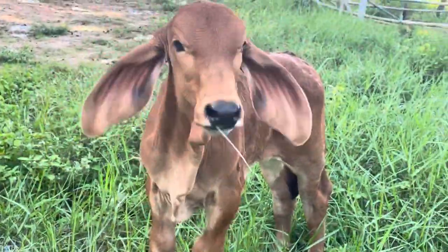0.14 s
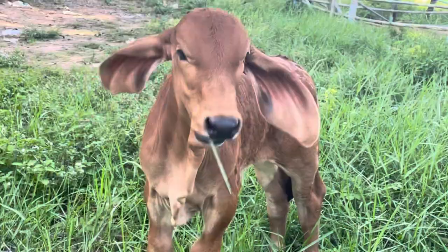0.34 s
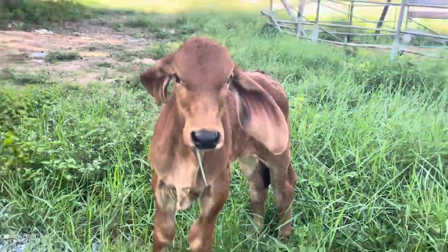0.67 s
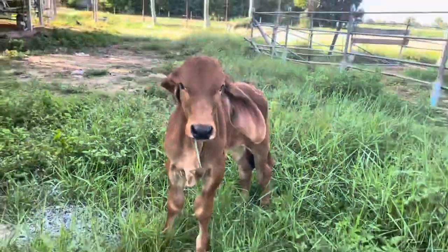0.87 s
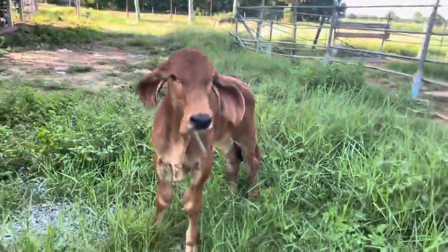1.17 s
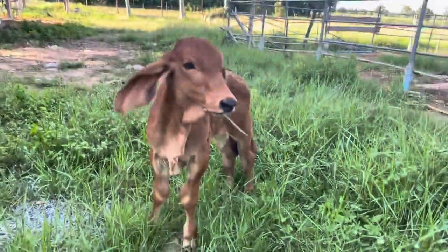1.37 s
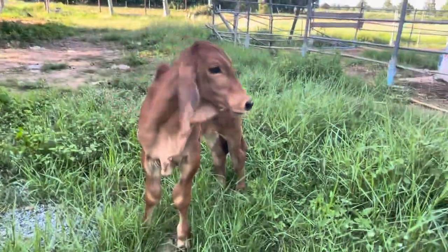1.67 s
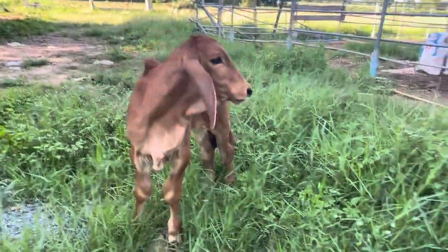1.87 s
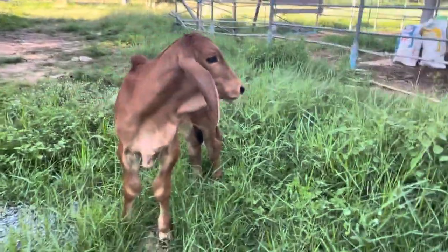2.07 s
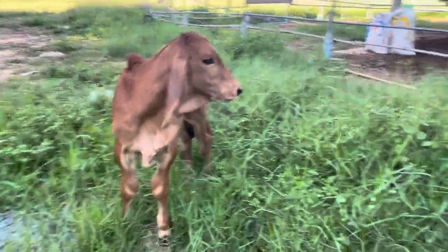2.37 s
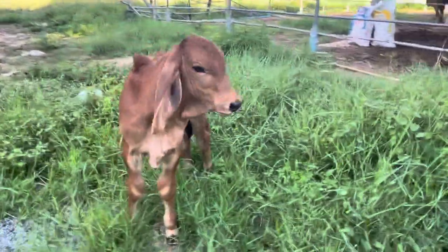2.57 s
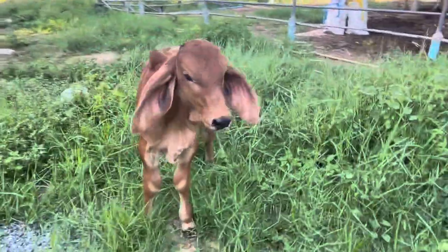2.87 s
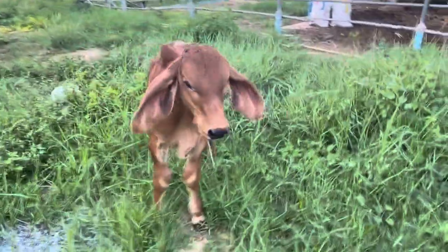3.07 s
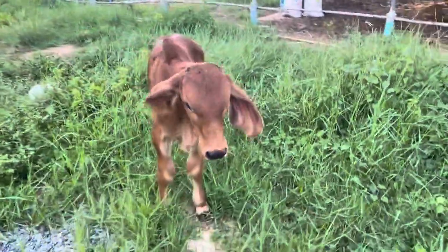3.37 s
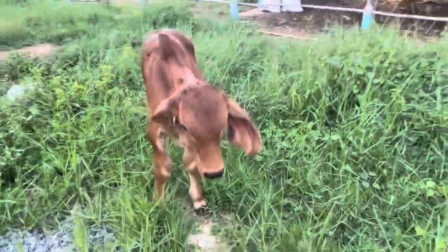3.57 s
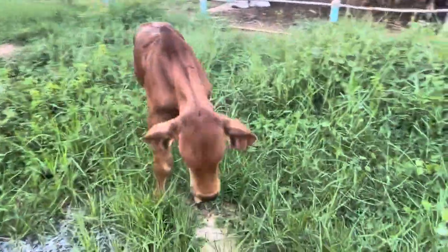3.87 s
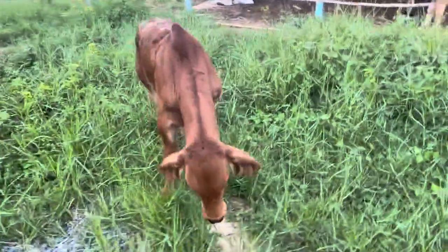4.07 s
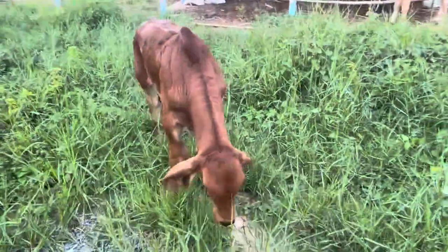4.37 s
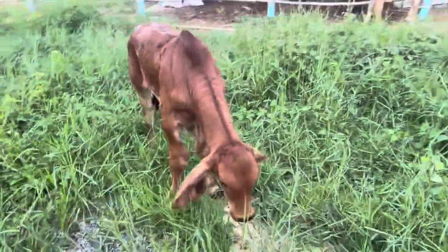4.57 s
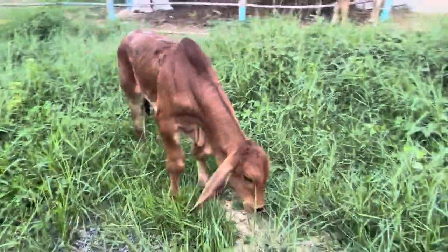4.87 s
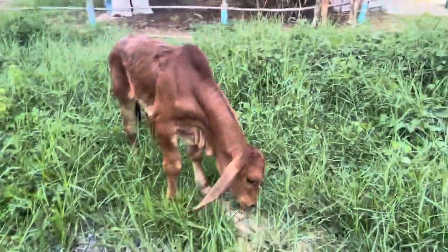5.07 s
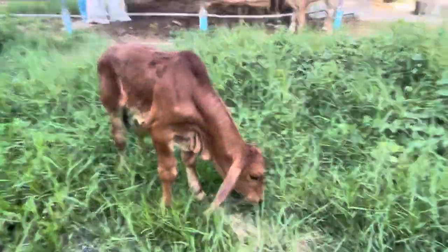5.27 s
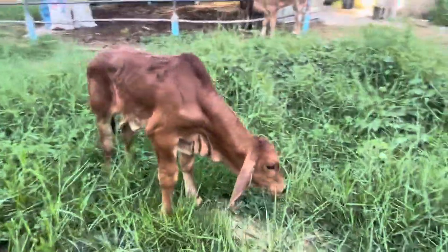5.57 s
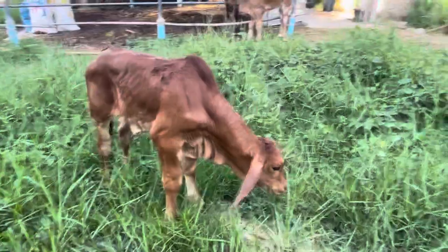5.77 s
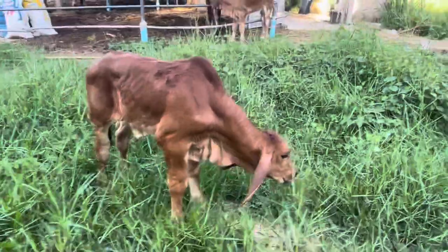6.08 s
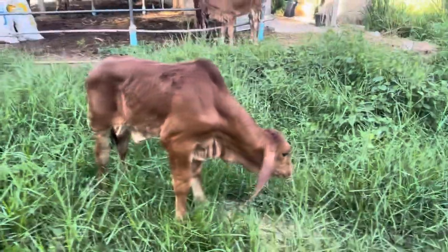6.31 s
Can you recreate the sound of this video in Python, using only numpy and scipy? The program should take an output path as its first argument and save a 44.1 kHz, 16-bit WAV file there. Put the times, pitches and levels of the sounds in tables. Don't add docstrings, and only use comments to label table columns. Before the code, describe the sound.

Outdoors in a grassy paddock, wind thumps the microphone while a calf croaks, then bawls hoarsely; stems crackle and distant birds whistle afterwards.

```python
import sys
import numpy as np
from scipy import signal
from scipy.fft import rfft, irfft
from scipy.io import wavfile
from scipy.ndimage import uniform_filter1d, map_coordinates

SR = 44100
rng = np.random.default_rng(int(sys.argv[2]) if len(sys.argv) > 2 else 0)


def to_wav(s):
    ch = np.atleast_2d(s).T
    pcm = np.round(np.clip(ch, -1, 1) * 32767)
    wavfile.write(sys.argv[1], SR, pcm.astype(np.int16))


def gain_from_decibels(decibels):
    exponent = np.asarray(decibels, float) / 20
    return 10 ** exponent


N = 284180
T = np.arange(N) / SR
HZ = np.fft.rfftfreq(N, 1 / SR) + 1e-3

# first_pulse_s, pulse_count, spacing_ms, effort_db
GROWL_RUNS = [(1.111, 1, 14, -22), (1.125, 1, 16, -17.5), (1.141, 3, 24.3, -17), (1.205, 3, 25, -16.5),
              (1.271, 4, 25.3, -17.5), (1.364, 4, 25.1, -17.5), (1.457, 4, 25.1, -16.5),
              (1.558, 5, 26.1, -16.5), (1.677, 2, 25, -16), (1.718, 4, 20, -22), (1.81, 20, 26.5, -36)]
# time_s, change_db
ACCENTS = [(1.153, 7), (1.217, 7), (1.284, 6), (1.296, -16), (1.347, 5), (1.439, 3), (1.532, 4),
           (1.364, -11), (1.377, 8), (1.402, 5), (1.47, 2), (1.495, 4), (1.508, 3), (1.546, 6), (1.702, 2),
           (1.718, -3), (1.74, -8), (1.762, -8)]
# centre_hz, width_hz, level_db
GROWL_THROAT = [(322, 70, -18.5), (442, 63, -15.5), (520, 15.6, -18), (737, 33, -2), (867, 100, -1),
                (1074, 116, 6.5), (1164, 110, -7), (1436, 83, -3), (1610, 150, -3.5), (1744, 54, -10.5),
                (2640, 92, -19.5)]
# centre_hz, width_hz, level_db
GROWL_MOUTH = [(1890, 54, -11), (2033, 55, -4)]
# time_s, then pitch_share of the low, the middle and the mouth resonances
THROAT_MOVES = [(1.1, .96, .97, 1.0), (1.15, .99, 1.0, 1.0), (1.19, 1.09, 1.02, .99),
                (1.225, 1.07, 1.02, .98), (1.25, 1.0, 1.01, .98), (1.4, 1.0, .98, .97),
                (1.62, .98, .96, 1.01), (1.655, .97, .92, .93), (1.75, .97, .88, .92)]
# centre_hz, width_hz, level_db
GROWL_BREATH = [(3150, 70, -41), (3560, 60, -29.5), (4550, 150, -41)]
# centre_hz, width_hz, level_db
NOSTRIL = [(4010, 60, -29)]
# centre_hz, width_hz, level_db
CRACK = [(2550, 200, -42), (3100, 120, -40), (3450, 80, -36), (4350, 100, -40), (4650, 100, -39)]
# start_s, length_s, from_hz, to_hz, level_db
LEAKS = [(1.77, .1, 3060, 3100, -60), (1.85, .2, 3120, 3100, -63), (1.72, .12, 1900, 1850, -59),
         (1.94, .18, 1860, 1840, -56)]

# time_s, rate_hz
NARROW_RATE = [(2.66, 214), (2.8, 234), (2.9, 110), (2.98, 40)]
# time_s, rate_hz
OPEN_RATE = [(2.84, 109.6), (3.05, 92), (3.4, 68.5), (3.6, 58), (4.1, 50.5)]
# time_s, level_db, chest_over_head_db
EFFORT = [(2.66, -61, -20), (2.76, -44, -15), (2.84, -36, 3), (3.0, -32, -1), (3.14, -29.5, 4.5),
          (3.24, -29, -0.5), (3.47, -36.5, 3), (3.8, -37, -11), (4.12, -54, -9)]
# start_s, end_s, mouth_db, sag_db_per_s
SHAPES = [
    (2.66, 2.94, 10.5, 20),
    (2.82, 3.6, -1.5, 7),
    (3.5, 4.05, 4, 12),
]
# centre_hz, width_hz, level_db
NARROW_SHAPE = [
    [(872, 14, 2), (1430, 87, -18)],
    [(1504, 68, -4), (1655, 52, -7.5), (2020, 93, -13.5), (3700, 87, -13)],
]
OPEN_SHAPE = [
    [(720, 64, 3), (801, 54, 4), (1003, 90, 3), (1290, 100, -6)],
    [(1566, 127, 4.5), (1870, 67, -7), (1905, 61, -4), (2144, 58, -7.5), (3570, 96, -16), (4500, 70, -23.5), (5000, 60, -23), (5270, 60, -22)],
]
CLOSING_SHAPE = [
    [(804, 62, -3), (990, 114, 2), (2080, 52, -15), (2460, 140, -7.5), (3500, 90, -16), (4400, 330, -16)],
    [(1322, 48, -1.5), (1440, 104, -4.5), (1900, 76, -20)],
]
# centre_hz, width_hz, level_db
CHEST = [(190, 40, -5), (264, 28, 0), (335, 45, -6), (425, 50, -12)]
# time_s, pitch_hz, level_db
TONE = [(2.88, 292, -50), (3.0, 272, -33), (3.07, 266, -26.5), (3.17, 262, -26.5), (3.21, 262, -41),
        (3.27, 270, -33), (3.42, 258, -34), (3.68, 240, -47), (3.75, 236, -62)]
# multiple, level_db
TONE_ORDERS = [(1, 1), (2, -38), (3, -4), (4, -16), (6, -25), (7, -20.5)]
# start_s, length_s, from_hz, to_hz, level_db
PARTIALS = [(2.68, .13, 1630, 1740, -50), (2.72, .2, 875, 815, -45), (2.79, .09, 1510, 1490, -47),
            (2.9, .18, 1615, 1540, -42), (3.09, .1, 1600, 1670, -46), (2.87, .05, 1500, 1480, -48),
            (2.94, .16, 1030, 1000, -45), (3.2, .11, 820, 785, -35), (3.3, .15, 800, 770, -37),
            (3.2, .14, 1910, 1960, -44), (3.0, .16, 2150, 2090, -49), (3.04, .1, 800, 780, -42),
            (3.55, .2, 1345, 1375, -46), (3.84, .14, 990, 1010, -48), (3.99, .25, 190, 228, -44),
            (2.78, .4, 3660, 3550, -56), (3.0, .17, 5250, 5230, -63), (3.12, .16, 4930, 4960, -64),
            (3.15, .1, 5480, 5520, -64), (3.42, .08, 5040, 5050, -63), (3.5, .08, 4950, 4940, -63)]
# frequency_hz, level_db, phase_rad
GROWL_EAR = [(700, -9, -1.65), (1100, -4, -1.9), (1350, 0, -3.2), (1750, -2, -3.6), (2100, -7, -5.8),
             (2650, -6, -9.5), (3300, -1, -12), (4000, -3, -13.2)]
# frequency_hz, level_db, phase_rad
BAWL_EAR = [(300, 1, -.8), (550, -5, -1.9), (750, -5, -2), (1050, 0, -2.7), (1450, 4, -4), (2080, 4, -6.4),
            (2700, 2, -8.8), (3500, -11, -10)]

# time_s, rumble_db, flutter_db
BREEZE = [(0, -35, -38.5), (.7, -42.5, -45), (1.2, -35, -34.5), (1.55, -36, -35.5), (1.78, -35, -36.5),
          (2.0, -33, -40.5), (2.4, -47, -42), (2.85, -25, -30.5), (3.2, -37, -31), (3.5, -43, -44.5),
          (4.2, -43.5, -45), (4.9, -43.5, -37.5), (5.3, -47.5, -50.5), (6.0, -50.5, -54),
          (6.44, -45.5, -46.5)]
# peak_s, peak_db, length_s
GUSTS = [(0.0, -31, 0.0083), (0.09, -27, 0.12), (0.478, -28.5, 0.03), (0.693, -34, 0.1),
         (0.985, -27.5, 0.11), (1.05, -22.5, 0.023), (1.163, -26, 0.05), (1.392, -22.5, 0.028),
         (1.452, -21, 0.025), (1.546, -24.5, 0.024), (1.718, -29, 0.064), (1.917, -31, 0.058),
         (2.038, -24, 0.042), (2.187, -22.5, 0.056), (2.356, -29, 0.048), (2.417, -27, 0.058),
         (2.564, -24.5, .02), (2.621, -14.5, 0.015), (2.753, -21.5, 0.098), (2.976, -25.5, 0.08),
         (3.124, -26.5, 0.036), (3.338, -32, 0.019), (3.596, -29.5, 0.032), (4.241, -32, 0.032),
         (4.894, -39, 0.1), (5.454, -39.5, 0.042), (5.61, -37.5, 0.053), (5.762, -37.5, 0.017)]
FLUTTER_GUST_DB = [0.5, -12.5, -12, -13, -13, -10.5, -10.5, -11, -11, -8, -10, -12, -11.5, -12, -10.5,
                   -17.5, -8, -14, -9.5, -14, 2, -10, -7, -8, -8, -1.5, -9.5, -9.5]
# frequency_hz, density_db
WIND_COLOUR = [(25, -54), (40, -7), (65, 1), (100, -3.5)]
# frequency_hz, density_db
FLUTTER_COLOUR = [(120, 2), (170, -0.5), (250, -5.5), (330, -19.5), (480, -29)]

# time_s, peak_db, ring_hz
KNOCKS = [(0.429, -46.5, 257), (0.498, -50, 231), (2.634, -62, 272), (4.148, -41, 256), (4.24, -30, 266),
          (4.569, -35, 300), (4.869, -32, 310), (5.14, -34.5, 730), (5.212, -33, 273), (5.214, -40, 690),
          (5.399, -38.5, 336), (5.854, -49, 645)]
# time_s, peak_db, left_minus_right_db
SNAPS = [(0.1294, -51, 0.0), (0.2234, -48, 0.0), (1.6741, -50, 2.0), (2.9921, -42, 0.5),
         (4.2263, -39, -1.5), (4.4952, -51, 1.0), (4.5441, -48, 0.5), (4.9154, -44, 0.0),
         (4.9257, -38, 1.5), (4.9304, -39, 1.5), (4.9444, -38, 2.5), (4.9554, -38, 1.5), (4.9934, -49, 0.5),
         (5.0074, -49, 1.5), (5.1044, -54, 0.5), (5.1442, -42, 0.5), (5.2144, -58, 1.0), (5.4444, -57, 0.5)]
# time_s, peak_db, ring_hz
TICKS = [(5.105, -49, 2900), (5.214, -31, 3200), (5.444, -46, 3800), (5.718, -33, 1800), (6.06, -44, 2500),
         (3.56, -46, 4200), (0.47, -43, 940)]
# start_s, hold_s, level_db
RUSTLES = [(0.0, 0.0031, -54), (0.223, 0.075, -65), (2.8, 0.062, -64), (2.893, 0.18, -58.5),
           (2.992, 0.254, -53), (3.265, 0.16, -59), (3.438, .04, -59), (3.536, 0.22, -61.5),
           (3.763, 0.043, -60.5), (3.852, 0.13, -59), (4.22, 0.0028, -60), (4.29, .004, -66),
           (4.68, 0.045, -67), (4.922, 0.037, -50), (4.977, 0.051, -58.5), (5.06, 0.084, -64),
           (5.678, .025, -63), (6.302, 0.062, -59), (6.397, .045, -61)]
# frequency_hz, density_db
GRASS_COLOUR = [(3500, -0.5), (5000, -1), (7000, -0.8), (9000, -3), (12000, -4), (13500, -9.5),
                (15600, -12)]

# top_s, top_hz, level_db
CHIRPS = [(4.408, 4985, -57), (4.80, 5045, -52), (5.149, 5055, -55), (5.53, 5055, -49), (5.914, 5055, -52),
          (6.348, 5225, -48)]
# offset_s, pitch_share, level_db
ARCH = [(-.03, .74, -15), (-.021, .85, -5), (-.013, .97, 1), (0, 1.0, 8), (.013, .96, 3), (.027, .84, -4),
        (.042, .65, -15)]
# start_s, length_s, from_hz, to_hz, level_db
WHISTLES = [(5.39, .03, 3150, 3250, -60), (5.485, .022, 3600, 3600, -55), (5.49, .05, 3050, 2500, -52),
            (5.525, .05, 2550, 2150, -46), (5.57, .06, 2200, 2050, -49), (5.685, .022, 2250, 2150, -48),
            (5.782, .045, 3400, 2850, -49), (5.812, .035, 2900, 2860, -47), (5.835, .085, 2880, 2930, -56),
            (5.908, .028, 2970, 2900, -47), (5.925, .04, 2900, 2400, -49), (5.948, .03, 2500, 2200, -43),
            (5.97, .065, 2300, 2100, -49), (6.092, .018, 2200, 2150, -46)]
# time_s, level_db
SCOLD = [(6.395, -63), (6.403, -49.5), (6.44, -49)]

# time_s, level_db, share_from_calf_side (0-1)
FIELD = [(0, -45.5, 0.84), (1, -49, 0.28), (1.6, -43.5, 0.23), (2.65, -48, 0.6), (3.3, -37, 0.92),
         (3.9, -42.5, 0.48), (4.15, -45, 0.53), (4.5, -44.5, 0.57), (5.2, -45.5, 0.6), (6.2, -44, 0.2),
         (6.44, -45, 0.5)]
# frequency_hz, density_db
FIELD_COLOUR = [(200, 8), (350, -5), (800, 3), (1100, 2), (1500, -7), (2100, -10.5), (3400, -20),
                (5500, -21.5)]
# frequency_hz, level_db
RIGHT_EAR = [(150, -9), (300, 0), (600, -13.5), (1100, -5), (1500, 3.5), (2200, 6), (3200, -18), (6000, -9)]

# time_s, bass_side_db, upper_middle_side_db
STEREO_OPENS = [(0, -8, -40), (.8, -8, -40), (.86, 0, 0), (6.44, 0, 0)]
# channel (0 mid, 1 side), low_hz, high_hz, threshold_db
DROPPED = [(0, 7600, 9050, -66), (0, 13700, 16500, -63), (1, 10400, 12800, -61)]
# start_s, end_s, low_hz, high_hz
HOLES = [(3.01, 3.085, 2760, 2880), (3.075, 3.14, 2660, 2780), (3.02, 3.11, 5740, 5860),
         (3.2, 3.275, 6090, 6220), (3.14, 3.2, 6660, 6790), (3.3, 3.35, 6720, 6850),
         (1.295, 1.35, 1250, 1340)]


def growl():
    clicks, weak = np.zeros((2, N))
    for s, count, spacing_ms, db in GROWL_RUNS:
        k = np.arange(0, count - .5, .5)
        chance = rng.standard_normal((len(k), 2))
        loose_s = .0003 + .002 * (k % 1) + .004 * (count > 10)
        at = ((s + k * spacing_ms / 1000 + loose_s * chance[:, 0]) * SR).astype(int)
        clicks[at] = gain_from_decibels(db - 19 * (k % 1) + chance[:, 1])
        weak[at] = clicks[at] * 2 * (k % 1)
    for s, db in ACCENTS:
        near = abs(T - s) < .006
        clicks = clicks * gain_from_decibels(db / 2 * near)
        weak = weak * gain_from_decibels(db * near)
    mouth_db = -20.5 + 26.5 * (T - GROWL_RUNS[0][0]) * (T < 1.71)
    bright = (clicks + weak) * gain_from_decibels(mouth_db)

    air = gain_from_decibels(-36) * rng.standard_normal(N)
    fading = [1, -np.exp(-1 / (.012 * SR))]
    low_air, high_air = (air * signal.lfilter([1], fading, x) for x in (clicks, bright))
    voiced = moving_throat(0.88 * clicks + 1.28 * low_air, 1.08 * bright + 1.4 * high_air)
    voiced = signal.sosfilt(signal.butter(2, 2700, fs=SR, output="sos"), voiced)
    voiced = dip(voiced, 2330)

    nose_open = (T > 1.145) * (T < 1.56)
    breath = resonate(low_air + .12 * weak, GROWL_BREATH)
    breath = breath + resonate((low_air + .45 * weak) * nose_open, NOSTRIL)
    breath = gain_from_decibels(8 + 1.5 * drift(15)) * breath
    crack_click = 1. * (np.arange(N) == int(1.674 * SR))
    breath = breath + resonate(crack_click, CRACK)
    return (voiced + breath) * gain_from_decibels(-6.0)


def moving_throat(throat_in, mouth_in):
    out, hop, ring = np.zeros(N), 512, 4096
    low, middle, mouth = in_time(THROAT_MOVES)
    for i in range(int(1.09 * SR), int(2.4 * SR), hop):
        a, b = (np.r_[x[i:i + hop], np.zeros(ring)] for x in (throat_in, mouth_in))
        throat_now = []
        for hz, width, db in GROWL_THROAT:
            share = low[i] if 600 < hz < 800 else middle[i] if 800 < hz < 1300 else 1
            throat_now.append((hz * share, width, db))
        mouth_now = [(hz * mouth[i], width, db) for hz, width, db in GROWL_MOUTH]
        out[i:i + hop + ring] += resonate(a, throat_now) + resonate(b, mouth_now)
    return out


def bawl():
    out = 0
    level_db, chest_db = in_time(EFFORT)
    source = hoarse(in_time(OPEN_RATE)[0], jitter=.07, air_db=-26)
    onset = hoarse(in_time(NARROW_RATE)[0], jitter=.04, air_db=-26)
    resonances = (NARROW_SHAPE, OPEN_SHAPE, CLOSING_SHAPE)
    for shape, (throat, mouth), x in zip(SHAPES, resonances, (onset, source, source)):
        start, end, mouth_db, sag_db = shape
        fade = np.clip(np.minimum(T - start, end - T) / 0.1, 0, 1)
        mouth_db = mouth_db - sag_db * np.clip(T - start, 0, 1)
        head = even(resonate(x, throat) + gain_from_decibels(mouth_db) * resonate(x, mouth), fade)
        chest = even(resonate(x, CHEST), fade)
        out = out + np.sqrt(fade) * (head + gain_from_decibels(chest_db) * chest)
    return dip(out * gain_from_decibels(level_db), 2800)


def hoarse(rate, jitter, air_db):
    phase = np.cumsum(rate * (1 + jitter * drift(45))) / SR
    clicks = np.diff(np.floor(phase), prepend=0)
    clicks = clicks * gain_from_decibels(2.5 * np.clip(rng.standard_normal(N), -3, 1))
    gate = 0.55 + np.exp(-3.0 * (phase % 1))
    return clicks + gain_from_decibels(air_db) * gate * rng.standard_normal(N)


def tone():
    hz, db = in_time(TONE)
    phase = 2 * np.pi * np.cumsum(hz * (1 + .006 * drift(14))) / SR
    stack = 0
    for k, order_db in TONE_ORDERS:
        waver_db = np.sqrt(k) * drift(23)
        stack = stack + gain_from_decibels(order_db + waver_db) * np.sin(round(k) * phase)
    return gain_from_decibels(db) * stack * (T > TONE[0][0]) * (T < TONE[-1][0])


def partials(rows):
    return sum(glide(*p) * gain_from_decibels(2.2 * drift(30)) for p in rows)


def wind():
    rumble_db, flutter_db = in_time(BREEZE)
    gusts, flaps = 0, 0
    for (s, db, length), flap_db in zip(GUSTS, FLUTTER_GUST_DB):
        spread = length * np.where(T < s, 0.64, 1)
        gust = gain_from_decibels(db) ** 2 * np.exp(-((T - s) / spread) ** 2)
        gusts = gusts + gust
        flaps = flaps + gain_from_decibels(flap_db) ** 2 * gust
    rumble = patchy(WIND_COLOUR, patch_db=1.5, rate=9.5, likeness=0.7, lag=5.0)
    flutter = patchy(FLUTTER_COLOUR, patch_db=3, rate=20, likeness=.75, lag=-9.0)
    lumps = gain_from_decibels(flutter_db) ** 2 + uniform_filter1d(flaps, size=900)
    push = rumble / uniform_filter1d(np.mean(rumble ** 2, axis=0), size=1300) ** .4
    power = gain_from_decibels(rumble_db) ** 2 + gusts
    low = np.sqrt(power) * (rumble + gusts / power * (push - rumble))
    balance = gain_from_decibels(np.array([[.6], [-.6]]))
    return (low + np.sqrt(lumps) * flutter) * balance * np.minimum(T / .004, 1)


def knocks():
    out = np.zeros(N)
    for s, db, hz in KNOCKS:
        t = np.maximum(T - s, 0)
        out += gain_from_decibels(db + 8.0) * np.sin(2 * np.pi * hz * t) * np.exp(-t / 0.0037)
        out += gain_from_decibels(db + 2.0) * np.sin(2 * np.pi * 170 * t) * np.exp(-t / 0.0032)
        out += gain_from_decibels(db - 8.0) * np.sin(2 * np.pi * 900 * t) * np.exp(-t / 0.0012)
    return lagged(out, -17.5, gain_from_decibels(-0.5))


def snaps():
    level, white = np.zeros((2, N)), rng.standard_normal(N)
    for s, db, pan_db in SNAPS:
        t = T - s
        sides_db = np.array([[pan_db], [-pan_db]]) / 2
        level += gain_from_decibels(db + 3.0 + sides_db) * (t > 0) * np.exp(-np.maximum(t, 0) / 0.0018)
    bright = signal.sosfilt(signal.butter(2, [3700, 14000], "band", fs=SR, output="sos"), white)
    return level * lagged(bright, -2.73)


def ticks():
    s, db, hz = np.transpose(TICKS)[:, :, None]
    t = np.maximum(T - s, 0)
    rings = gain_from_decibels(db) * np.sin(2 * np.pi * hz * t) * np.exp(-t / 0.00046)
    return lagged(np.sum(rings, axis=0), 3.0, gain_from_decibels(5.0))


def grass():
    power = gain_from_decibels(-65) ** 2
    for s, hold, db in RUSTLES:
        before = np.maximum(s - T, 0) / 0.0078
        after = np.maximum(T - s - hold, 0) / 0.011
        power = power + gain_from_decibels(db) ** 2 * np.exp(-2 * (before + after))
    return np.sqrt(power) * patchy(GRASS_COLOUR, patch_db=1.5, rate=11, likeness=0.6, lag=-8.0)


def birds():
    chirps = 0
    for s, hz, db in CHIRPS:
        chirps = chirps + sing([(s + ds, hz * share, db + d) for ds, share, d in ARCH])
    chirps = chirps * gain_from_decibels(2.2 * drift(55) - 1)
    whistles = sum(glide(*w) for w in WHISTLES) * gain_from_decibels(-5.5 + 3 * drift(50))
    scold = rms_one(resonate(rng.standard_normal(N), [(2780, 3400, 0.1)])) * gain_from_decibels(in_time(SCOLD)[0])
    direct = lagged(chirps + scold, -13, gain_from_decibels(-4.5)) * gain_from_decibels(2.5) + lagged(whistles, -12, gain_from_decibels(2))
    return direct + paddock(chirps + whistles, t60=.33, wet_db=-11)


def glide(s, length, from_hz, to_hz, db):
    middle = [(s + share * length, from_hz + share * (to_hz - from_hz), db) for share in (.25, .8)]
    return sing([(s, from_hz, db - 12.0), *middle, (s + length, to_hz, db - 7)])


def sing(rows):
    hz, db = in_time(rows)
    sounding = (T > rows[0][0]) * (T < rows[-1][0])
    return gain_from_decibels(db) * np.sin(2 * np.pi * np.cumsum(hz) / SR) * sounding


def far_field():
    field_db, share = in_time(FIELD)
    field = gain_from_decibels(field_db) * patchy(FIELD_COLOUR, patch_db=1.38, rate=11, likeness=share, lag=19.0)
    field[1] = irfft(rfft(field[1]) * colour(RIGHT_EAR, skirt_db=3.0) ** 0.32, N)
    return field


def paddock(x, t60, wet_db):
    t = np.arange(int(.6 * SR)) / SR
    echoes = rng.standard_normal((2, len(t))) * gain_from_decibels(-60 * t / t60) * (t > .006)
    echoes = signal.lfilter([1], [1, -.5], echoes)
    echoes = echoes / np.sqrt(np.sum(echoes ** 2, axis=1, keepdims=True))
    return gain_from_decibels(wet_db) * signal.fftconvolve(x[None], echoes, axes=1)[:, :N]


def patchy(points, patch_db, rate, likeness, lag):
    near, left, right = rfft(rng.standard_normal((3, N))) * colour(points)
    late = near * np.exp(-2j * np.pi * HZ * lag / SR)
    out, together, alike = 0, drift(rate / 3), np.clip(likeness, 0, 1)
    for centre in np.arange(np.log2(points[0][0]) - .5, np.log2(points[-1][0]) + 1, .5):
        strip = np.cos(np.pi / 2 * np.clip((np.log2(HZ) - centre) * 2, -1, 1)) ** 2
        a, b, c, d = irfft(np.array([near, late, left, right]) * strip, N)
        pair = np.sqrt(alike) * np.array([a, b]) + np.sqrt(1 - alike) * np.array([c, d])
        out = out + pair * gain_from_decibels(patch_db * (1.07 * together + drift(rate)))
    return rms_one(out)


def resonate(x, modes):
    out = 0
    for k, (hz, width, db) in enumerate(modes):
        r, w = np.exp(-np.pi * width / SR), 2 * np.pi * hz / SR
        ringing = signal.lfilter([0, np.sin(w)], [1, -2 * r * np.cos(w), r * r], x + 1e-18)
        out = out + (-1) ** k * gain_from_decibels(db) * ringing
    return out


def dip(x, hz):
    return signal.lfilter(*signal.iirnotch(hz, 7, SR), x)


def heard(x, ear):
    last_hz, last_db, last_phase = ear[-1]
    rows = [(0, 0, 0), *ear, (SR / 2, last_db, last_phase * SR / 2 / last_hz)]
    hz, db, phase = np.transpose(rows)
    return lagged(x, 0, gain_from_decibels(np.interp(HZ, hz, db)) * np.exp(1j * np.interp(HZ, hz, phase)))


def lagged(x, lag, gain=1):
    return np.array([x, irfft(rfft(x) * gain * np.exp(-2j * np.pi * HZ * lag / SR), N)])


def colour(points, skirt_db=-30):
    hz, db = np.transpose(points)
    hz = np.r_[hz[0] / 2, hz, hz[-1] * 2]
    db = np.r_[db[0] + skirt_db, db, db[-1] + skirt_db]
    return gain_from_decibels(np.interp(np.log(HZ), np.log(hz), db))


def drift(rate):
    knots = rng.standard_normal(int(N / SR * rate * 2) + 4)
    return rms_one(map_coordinates(knots, [T * rate * 2 + 1], order=3))


def in_time(rows):
    s, *columns = np.transpose(rows)
    return [np.interp(T, s, c) for c in columns]


def even(x, during):
    return x / np.sqrt(np.sum(during * x ** 2) / np.sum(during))


def rms_one(x):
    return x / np.sqrt(np.mean(x ** 2) + 1e-20)


def scene():
    growling, bawling = growl(), bawl() + tone()
    voice = heard(growling, GROWL_EAR) + heard(bawling, BAWL_EAR)
    voice = voice + paddock(.7 * growling + 1.3 * bawling, t60=.35, wet_db=-18)
    voice = voice + heard(partials(PARTIALS), BAWL_EAR) + heard(partials(LEAKS), GROWL_EAR)
    return voice + wind() + knocks() + snaps() + ticks() + grass() + birds() + far_field()


def low_pass(x):
    return signal.sosfilt(signal.butter(12, 15800, fs=SR, output="sos"), x)


def record(dry):
    pair = np.array([dry[0] + dry[1], dry[0] - dry[1]]) / 2
    bass, upper_middle = HZ < 2100, (HZ >= 2100) & (HZ < 6300)
    for band, db in zip((bass, upper_middle), in_time(STEREO_OPENS)):
        pair[1] += irfft(rfft(pair[1]) * band, N) * (gain_from_decibels(db) - 1)
    for which, low_hz, high_hz, floor_db in DROPPED:
        band = irfft(rfft(pair[round(which)]) * (HZ > low_hz) * (HZ < high_hz), N)
        quiet = uniform_filter1d(band ** 2, size=1024) < gain_from_decibels(floor_db) ** 2
        pair[round(which)] -= band * uniform_filter1d(quiet * 1., size=512)
    for start, end, low_hz, high_hz in HOLES:
        band = irfft(rfft(pair[0]) * (HZ > low_hz) * (HZ < high_hz), N)
        pair[0] -= band * uniform_filter1d((T > start) * (T < end) * 1., size=512)
    mid, side = pair
    return low_pass(np.array([mid + side, mid - side]))


dry = scene()
out = record(dry)
to_wav(out)
```